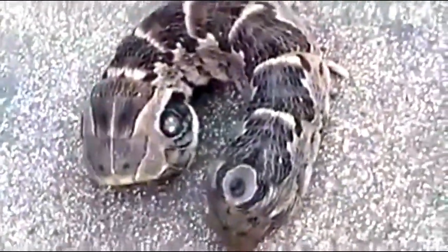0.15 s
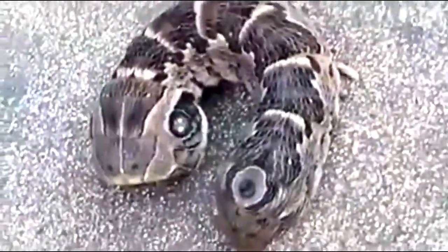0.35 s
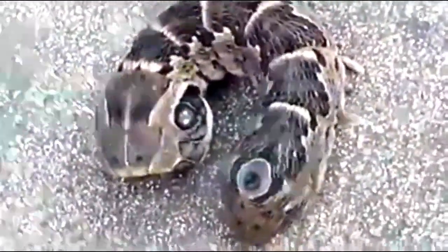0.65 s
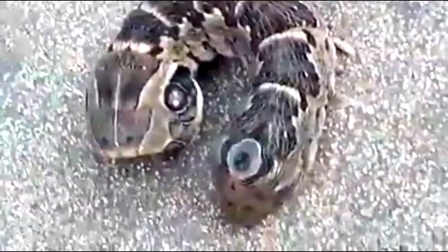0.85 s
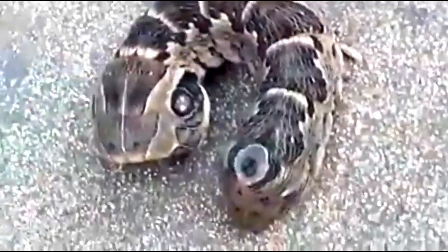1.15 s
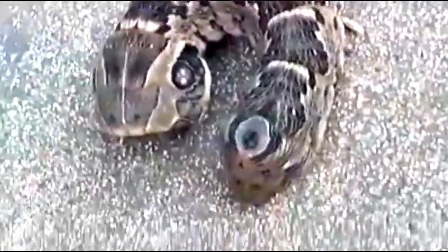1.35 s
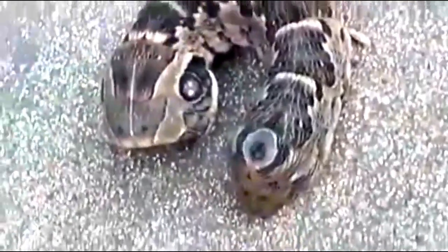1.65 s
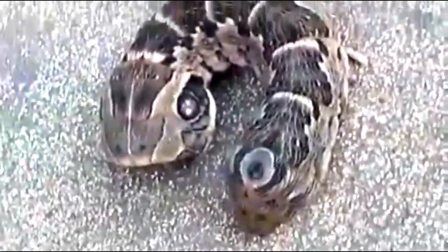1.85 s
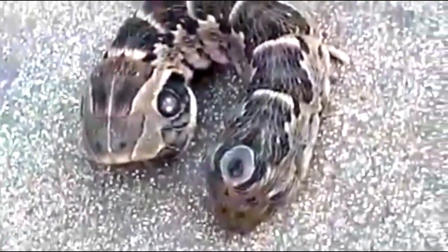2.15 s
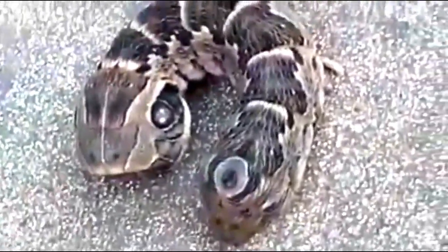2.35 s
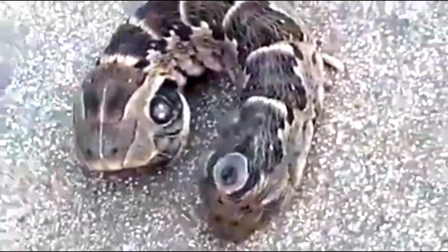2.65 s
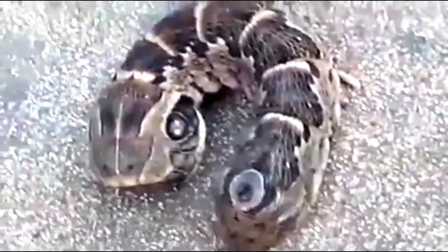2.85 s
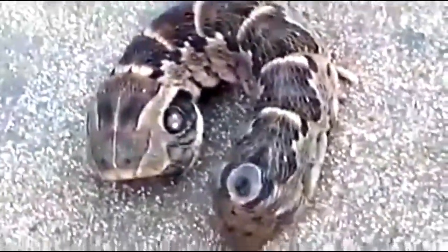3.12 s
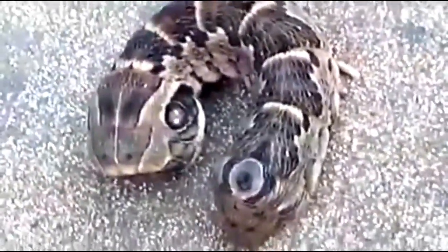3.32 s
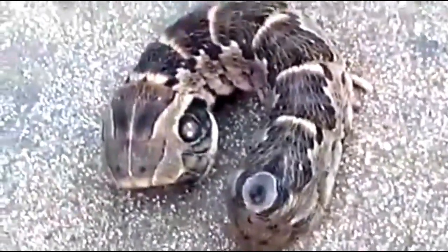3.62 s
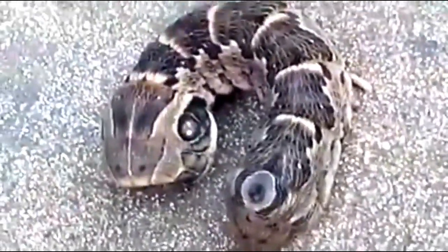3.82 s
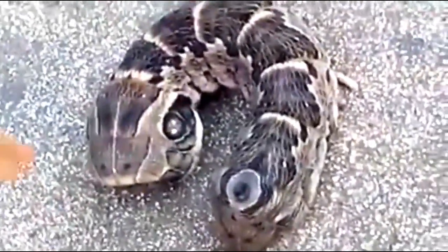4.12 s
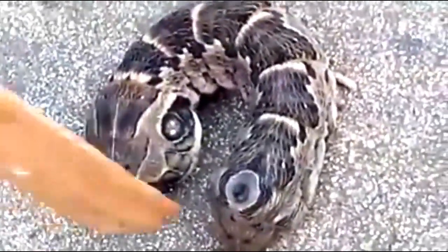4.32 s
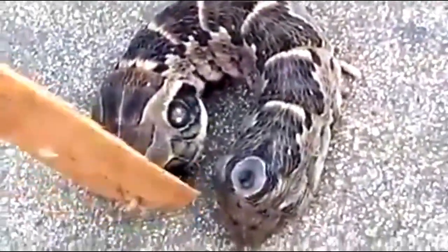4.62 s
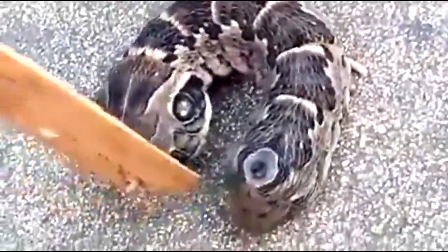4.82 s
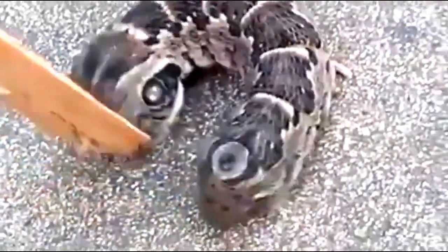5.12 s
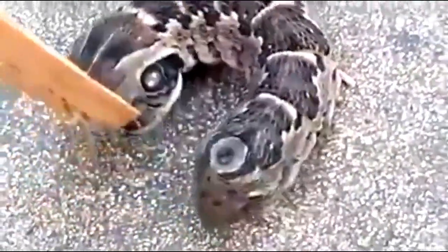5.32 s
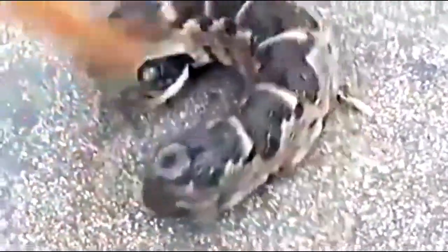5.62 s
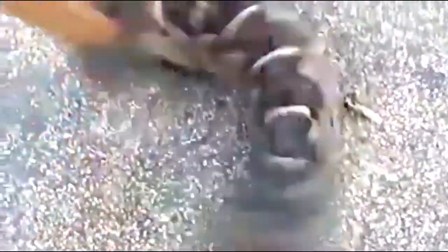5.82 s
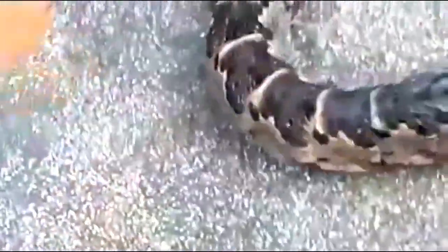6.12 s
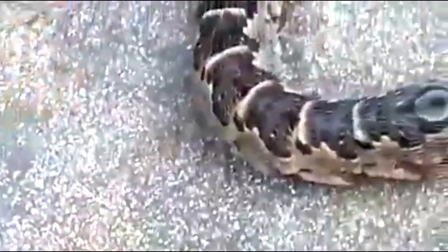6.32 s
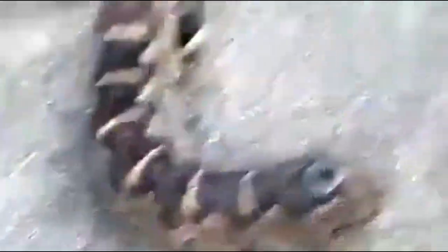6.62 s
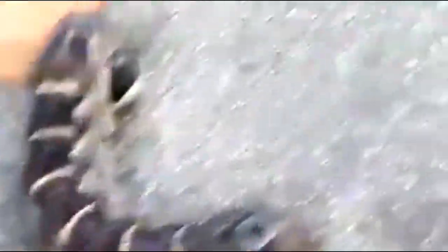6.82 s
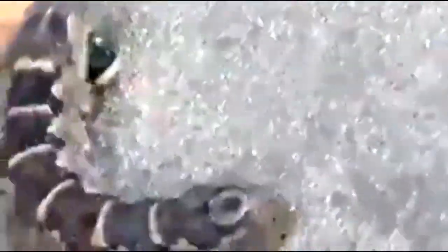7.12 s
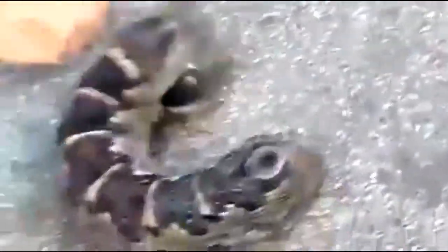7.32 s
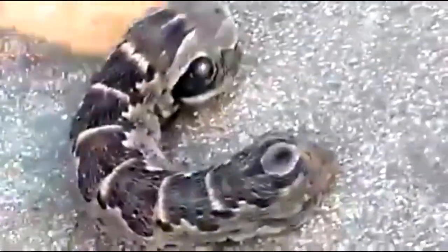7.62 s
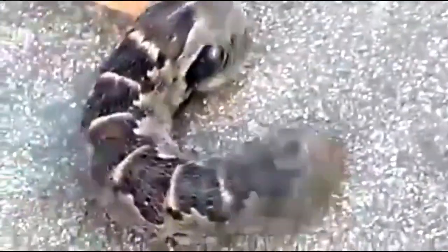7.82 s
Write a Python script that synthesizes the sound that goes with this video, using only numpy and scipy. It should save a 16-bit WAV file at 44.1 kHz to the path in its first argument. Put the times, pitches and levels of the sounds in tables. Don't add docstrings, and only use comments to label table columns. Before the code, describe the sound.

Outdoors on a hard, gritty slab, over a faint unsteady low hum and thin air hiss. At 0 s a hard knock clatters into quick slaps and bright grit skids until about 0.15 s. Quiet taps and a soft scuff lead to a sharp cracking knock at 1.2 s, with a lesser one at 1.5. A duller knock at 2.0 is followed by a crackly twist of grit from 2.2 to 2.5. Near quiet, then the loudest, cleanest knock at 3.4 with a deep boom and short wall echo. A dull double knock comes at 4.2, with a few grains after. A short knock lands at 5.4, trailing ticks, then a thin, cracking one at 6.2 with a small tap after. Tiny taps and a barely audible rub around 7.2 precede a soft knock at 7.4 with bright crunching grit, fading into hum.

```python
import sys
import numpy as np
from scipy import signal
from scipy.fft import rfft, irfft, next_fast_len
from scipy.io import wavfile
from scipy.ndimage import uniform_filter1d, map_coordinates

SR = 44100
rng = np.random.default_rng(int(sys.argv[2]) if len(sys.argv) > 2 else 0)


def wav_out(sig):
    wavfile.write(sys.argv[1], SR, np.round(np.clip(np.atleast_2d(sig).T, -1, 1) * 32767).astype(np.int16))


def field_ratio(decibels):
    return 10 ** (np.asarray(decibels, dtype=float) / 20)


N = 351029

# start in seconds, level in dB.
LANDINGS = [
    (-.04, -43.5),
    (1.249, -43.5),
    (1.991, -49),
    (3.403, -40.5),
    (4.19, -59),
    (5.425, -44),
    (5.871, -64.5),
    (6.929, -64.5),
    (7.428, -50.5),
]


def unit(x):
    return x / np.sqrt(np.mean(x ** 2) + 1e-20)


def peak(x):
    return x / np.max(np.abs(x))


def along(points, hz):
    f, v = np.transpose(points)
    return np.interp(np.log(hz + 1), np.log(f + 1), v)


def curve(rows, axis=1):
    rows = np.array(rows)
    return np.interp(np.arange(N) / SR, rows[:, 0], rows[:, axis], left=-130, right=-130)


def filtered(x, response):
    m = next_fast_len(len(x) + 2048)
    spectrum = rfft(x, m) * response(np.fft.rfftfreq(m, 1 / SR))
    return irfft(spectrum, m)[:len(x)]


def mode(f, hz, width):
    return 1j * f * width / (hz * hz - f * f + 1j * f * width)


def soft(f, hz):
    return hz * hz / (hz * hz - f * f + 1.4j * f * hz)


def add(track, s, x):
    i = round(s * SR)
    x = x[..., max(-i, 0):][..., :N - max(i, 0)]
    track[..., max(i, 0):max(i, 0) + x.shape[-1]] += x


def burst(length_s, spike, hold):
    t = np.arange(2048) / SR
    noise = rng.standard_normal(len(t))
    rise = 1 - np.exp(-t / (0.039 * hold * length_s))
    return noise * np.abs(noise) ** spike * rise * np.exp(-(t / length_s) ** hold)


def contact(force, db, response, axis):
    out = np.zeros((3, len(force)))
    out[0] = field_ratio(db) * peak(filtered(force, response))
    samples = np.arange(len(force))
    even = filtered(samples == 0, response) * np.exp(-samples / (.003 * SR))
    out[axis] = even * np.linalg.norm(out[0]) / np.linalg.norm(even)
    return out


def slab():
    # pitch in Hz, level in dB, time to die 60 dB in seconds.
    slab_modes = [(32.1, 2, 0.78), (42.7, -2.5, 1)]
    out, t = np.zeros(N), np.arange(SR) / SR
    for s, db in LANDINGS:
        start = rng.random()
        ring = sum(field_ratio(level_db - 60 * t / t60) * np.sin(2 * np.pi * (hz * (t - .085) + start))
                   for hz, level_db, t60 in slab_modes)
        add(out, s, field_ratio(db + 6.5) * ring * (1 - np.exp(-t / 0.014)))
    return out


def hum():
    # frequency in Hz, density in dB per Hz.
    air_colour = [(35, -24), (60, -1), (177, -9.5), (263, -10.5), (349, -13), (401, -18.5), (705, -25),
                  (1360, -30), (2560, -35.5), (14900, -37), (16400, -49)]
    # time in seconds, level in dB.
    rumble_levels = [(0.0, -60.5), (0.33, -64), (1.13, -69), (1.42, -77.5), (1.77, -64.5), (2.22, -67.5),
                     (2.68, -70.5), (3.3, -72.5), (3.55, -56.5), (3.77, -64), (4.17, -58.5), (4.5, -68),
                     (5.23, -73), (5.61, -58), (6.78, -68.5), (7.42, -74.5), (7.58, -61), (7.96, -60)]
    hum_db, stirred_db, settles_db_per_s = -74.5, -9.5, 64.5

    def sway(rate_hz):
        drift = rng.standard_normal(int(N * rate_hz / SR) + 4)
        return map_coordinates(drift, [np.arange(N) * rate_hz / SR])

    rumble = unit(filtered(rng.standard_normal(N), lambda f: mode(f, 38, 22) ** 2))
    air = filtered(rng.standard_normal(N), lambda f: field_ratio(along(air_colour, f)) * (f > 55))
    far = unit(filtered(air, lambda f: 1 / (1 + (f / 700) ** 2)))
    hiss = filtered(unit(air), lambda f: 1 / (1 + (700 / (f + 1)) ** 2))
    t = np.arange(N) / SR
    stirred = sum(field_ratio(db + stirred_db - settles_db_per_s * np.abs(t - s)) * (t > s) for s, db in LANDINGS)
    low = field_ratio(curve(rumble_levels) + 1.1 * sway(18)) * rumble
    return low + (field_ratio(hum_db) + stirred) * field_ratio(0.4 * sway(3.5)) * far + field_ratio(-71.5) * hiss


def blows():
    # start in seconds, knock in dB, crack in dB, chatter in seconds, main mode in Hz.
    heel_rows = [
        (0.0, -17.5, -18, 0.0082, 297.7),
        (1.232, -14.5, -6.5, 0.0079, 510),
        (1.509, -19, -53, 0.0071, 555.3),
        (2.009, -17, -22.5, 0.0076, 490.8),
        (3.381, -8, -16.5, 0.0049, 639),
        (4.186, -16, -27, 0.0059, 445),
        (5.405, -16, -15.5, 0.004, 540),
        (6.166, -33, -5.5, 0.0035, 1213),
        (7.409, -25, -5, 0.0063, 382.5),
    ]
    # start in seconds, knock in dB, weight in dB, crack in dB, main mode in Hz.
    slap_rows = [(0.012, -19, -14, -12, 327.7), (0.044, -26.5, -2.5, -15, 421),
                 (0.077, -25.5, -36, -13.5, 608), (1.243, -25.5, -3.5, -17.5, 329),
                 (1.991, -21.5, -8.5, -10, 499), (1.997, -25.5, -4.5, -13, 404.5),
                 (2.039, -35.5, 4, -7, 524), (3.393, -21, -3, -15.5, 322), (4.193, -22, -3.5, -12, 366),
                 (4.202, -17, -52, -28, 496), (5.417, -37.5, -9.5, 1, 444), (6.173, -31, -3.5, -46.5, 301),
                 (6.178, -28, -7.5, -5.5, 306), (6.328, -37, -4.5, -12.5, 460),
                 (7.407, -21.5, -1, -14.5, 330)]
    # centre in Hz, width in Hz, level in dB.
    sole_modes = [(100, 12, -7), (137, 41, 1), (327, 100, 2), (512, 25, -3), (743, 200, -3),
                  (1114, 240, -1), (1504, 320, -6), (1970, 350, -6), (2470, 280, -8.5), (3300, 1100, -14)]
    heel_weight_db, slap_chatter_s = -14.5, .0036
    heels = [(s, db, heel_weight_db, crack_db, chatter, hz) for s, db, crack_db, chatter, hz in heel_rows]
    slaps = [(s, db, weight_db, crack_db, slap_chatter_s, hz) for s, db, weight_db, crack_db, hz in slap_rows]
    out = np.zeros((3, N))
    for s, db, weight_db, crack_db, chatter, hz in heels + slaps:
        force = burst(chatter, spike=.8, hold=1.5)
        scatter = rng.normal(0, 2, len(sole_modes))
        force[20] = 0.49 * np.linalg.norm(force)
        hard_hz = 2600 * field_ratio(0.28 * (crack_db + 21.5))

        def ring(f, modes):
            return sum((-1) ** k * field_ratio(level_db + scatter[k]) * mode(f, centre, width)
                       for k, (centre, width, level_db) in enumerate(modes))

        def knock_colour(f):
            main = field_ratio(9.0) * mode(f, hz, 0.13 * hz) * hz / (1j * f + 1)
            return (ring(f, sole_modes[3:]) + main) * soft(f, hard_hz)

        knock = contact(force, db - 0.5, knock_colour, axis=1)
        thud = contact(force, db + weight_db + 3.5, lambda f: ring(f, sole_modes[:3]) * soft(f, 500), axis=1)
        edge = burst(chatter, spike=0.54, hold=0.75)
        crack = contact(edge, db + crack_db + 6.5, lambda f: mode(f, 1.5 * hard_hz, 3.2 * hard_hz) ** 2, axis=2)
        add(out, s - .0008, knock + thud + crack)
    return out


def grit(rows, hold, wet_db, lead):
    def sole_colour(f):
        return (mode(f, 900, 400) - .8 * mode(f, 1600, 820)) * mode(f, 1100, 4500)

    out = np.zeros((3, N))
    for s, db, dull_db, hz, length in rows:
        force = burst(length, spike=0.45, hold=hold)
        force[10] = lead * np.linalg.norm(force)
        snap = contact(force, db + 2.0, lambda f: mode(f, hz, 1.5 * hz) ** 2, axis=2)
        tap = contact(force, db + dull_db, sole_colour, axis=1)
        add(out, s - .0005, snap + tap)
    return out * field_ratio([[0], [wet_db], [wet_db]])


def all_grit():
    # start in seconds, peak in dB, dull part in dB, centre in Hz, length in seconds.
    skids = [(.003, -27.5, -13.5, 8000, 0.013), (0.053, -30, -6, 5860, 0.0058),
             (.044, -35, 2.5, 3000, .005), (0.105, -40.5, -7, 6110, 0.019), (0.13, -31, -8, 5740, .026),
             (1.505, -57.5, 5.5, 2500, .005), (1.510, -42, -5, 3503, 0.0082),
             (1.534, -49, -6, 7900, 0.0018), (1.974, -43.5, 6, 4890, 0.023),
             (4.179, -30, -6.5, 6016, 0.0093), (4.204, -34, -3, 7236, 0.013),
             (5.399, -34.5, -1.5, 7447, 0.0064), (5.417, -34, 7.5, 6000, 0.011),
             (5.432, -47.5, -15.5, 7000, 0.0086), (5.496, -45.5, -13, 10000, .002),
             (5.516, -48, -17, 7450, .003), (6.161, -31.5, -9, 7050, .006), (6.166, -27, -5, 8860, 0.0077),
             (6.216, -32, -13, 9740, 0.016), (7.404, -48.5, 7.5, 3000, 0.0049),
             (7.413, -26, -2.5, 7681, 0.018), (7.431, -18, -11, 9180, 0.0076),
             (7.44, -18.5, -17, 8450, 0.014), (7.489, -25, -12, 10200, .003)]
    # start in seconds, peak in dB, dull part in dB, centre in Hz.
    grains = [(0.388, -55.5, -35, 6170), (1.264, -37.5, -11, 3700), (1.394, -45, -0.5, 7530),
              (1.7793, -55.5, 2.5, 3650), (2.578, -69, 10.5, 3500), (2.691, -68.5, 7, 3740),
              (2.849, -59, 1.5, 3500), (3.2088, -62.5, 7, 3940), (3.3967, -26.5, -7.5, 7210),
              (3.7287, -64.5, -3, 3752), (3.8168, -71, 4.5, 3650), (4.3107, -47, -3, 3670),
              (4.4333, -39.5, -9.5, 3503), (4.733, -72.5, 15, 12650), (5.4609, -33.5, 2, 5730),
              (5.6188, -39.5, -12, 3994), (5.681, -61.5, 9.5, 3492), (5.7867, -51.5, -5, 5500),
              (5.848, -43, -1, 5020), (6.2027, -36, -8, 8700), (7.1127, -56, 0.5, 6070),
              (7.5192, -24.5, -13, 4998)]
    # start in seconds, peak in dB, dull part in dB.
    graze_rows = [(.549, -68.5, -4.5), (1.148, -61.5, 6), (1.177, -63, -4), (1.186, -59, -16),
                  (1.203, -60, 8), (1.216, -49, -3.5), (3.317, -61.5, 1), (3.356, -55.5, -9.5),
                  (5.308, -65.5, -5), (5.327, -59, -2), (5.348, -66, 8.5), (5.369, -48.5, 0.5),
                  (5.379, -59, -5.5), (5.393, -56.5, -1)]
    # start in seconds, peak in dB.
    twist_rows = [(2.1914, -47.5), (2.1996, -53), (2.2194, -62), (2.233, -47), (2.244, -44), (2.2491, -45),
                  (2.2712, -39.5), (2.296, -41.5), (2.329, -54.5), (2.343, -54), (2.3526, -50.5),
                  (2.375, -43), (2.3938, -49), (2.431, -70), (2.4462, -51.5), (2.4808, -66)]
    grain_s, graze_s, graze_hz = .002, .004, 5500
    twist_hz, twist_dull_db, dulls_db_per_s = 4340, -14, 62
    lone = [(*row, grain_s) for row in grains]
    twist_start = twist_rows[0][0]
    twist = [(s, db, twist_dull_db + dulls_db_per_s * (s - twist_start), twist_hz, grain_s)
             for s, db in twist_rows]
    grazes = [(*row, graze_hz, graze_s) for row in graze_rows]
    crushed = grit(lone + twist, hold=1.5, wet_db=-3, lead=.6)
    return crushed + grit(grazes + skids, hold=2.4, wet_db=-2.5, lead=0.18)


def walls(x):
    # frequency in Hz, time to die 60 dB in seconds.
    decay_times = [(100, 0.21), (500, 0.7), (1500, 0.62), (4000, 0.58), (8000, 0.55), (14000, 0.15)]
    # frequency in Hz, level in dB.
    sent_back = [(100, -6), (500, -7), (2000, -4.5), (8000, -3.5), (15000, -4)]
    out, size = np.zeros(N), SR // 2
    for i in range(0, N, size):
        hz, t, z = signal.stft(rng.standard_normal(SR * 3 // 4), SR, nperseg=256)
        fade = field_ratio(-60 * t / along(decay_times, hz)[:, None]) + 3.3 * field_ratio(-60 * t / 0.21)
        tail = signal.istft(z * fade, SR, nperseg=256)[1]
        add(out, i / SR + .004, signal.fftconvolve(x[i:i + size], tail / np.linalg.norm(tail)))
    return filtered(out, lambda f: field_ratio(along(sent_back, f)))


def corner(x):
    # pitch in Hz, width in Hz, level in dB.
    standing_waves = [(330, 5.6, -3), (510, 6, 1), (1990, 14, -6)]
    return field_ratio(-3) * filtered(x, lambda f: sum(field_ratio(db) * mode(f, hz, width) for hz, width, db in standing_waves))


def drag():
    # moment of most pressure in seconds, level in dB, seconds to build up 20 dB,
    # seconds to die 20 dB (the sign of both is ignored), sole resonance in Hz.
    drag_rows = [(.53, -79, -0.4, 0.6, 1137), (1.14, -73, 0.04, -1.5, 1700), (1.18, -63, -0.23, 0.3, 1850),
                 (1.218, -58.5, -0.04, 0.3, 1200), (1.62, -71, -1.5, .5, 786.6),
                 (2.25, -54, 0.11, 0.15, 1332), (2.29, -54, 0.1, 0.14, 450),
                 (3.322, -59, .008, -0.48, 1506), (3.372, -56, -0.03, 0.1439, 1440),
                 (5.393, -60, 0.1086, 0.26, 1090), (5.87, -70.5, 0.4, 0.4, 2833),
                 (7.25, -78, -0.4, -0.5, 1237), (7.38, -79, -0.2, 2.8, 870)]
    # time in seconds, level in dB.
    rub_levels = [
        (7.13, -97.5),
        (7.2, -85),
        (7.31, -85.5),
        (7.37, -95),
    ]
    bright_db = -14.5
    clumps = field_ratio(5 * unit(uniform_filter1d(rng.standard_normal(N), size=90)))
    rough = clumps * rng.standard_normal(N)
    bright = unit(filtered(rough, lambda f: mode(f, 7100, 6700) ** 2))
    rub = unit(filtered(rng.standard_normal(N), lambda f: mode(f, 1360, 90) ** 2))
    out = field_ratio(curve(rub_levels)) * rub
    around = np.arange(-SR // 2, SR // 2)
    t = around / SR
    for s, db, build, die, hz in drag_rows:
        i = np.clip(round(s * SR) + around, 0, N - 1)
        dull = unit(filtered(rough[i], lambda f: mode(f, 710, 1500) ** 2 + 1.4 * mode(f, hz, .2 * hz)))
        pressure_db = db - 20 * np.where(t < 0, -t / abs(build), t / abs(die))
        add(out, s - .5, field_ratio(pressure_db - 2.5) * (dull + field_ratio(bright_db) * bright[i]))
    return out


def taps():
    # start in seconds, peak in dB, pitch in Hz.
    tap_rows = [(.535, -60.5, 1000), (.549, -64, 2020), (.637, -70, 1800), (.92, -69, 1891),
                (.938, -62.5, 1688), (1.02, -68, 909.7), (1.048, -59, 800), (1.049, -60, 1700),
                (1.177, -52.5, 1850), (3.208, -57.5, 850), (3.209, -58, 2000), (3.273, -60, 916.5),
                (3.316, -57.5, 1500), (3.325, -50.5, 347.6), (3.352, -61, 2010), (2.849, -59, 1900),
                (4.733, -62.5, 650), (1.204, -56, 913), (1.778, -60, 600), (5.74, -62.5, 751.7),
                (5.955, -57.5, 1001), (6.329, -37.5, 424), (1.233, -20.5, 1797), (6.685, -67, 803),
                (6.977, -60.5, 797.4), (7.111, -60, 900), (7.36, -72, 897)]
    contact_s, width_over_pitch = 0.0028, .6
    out = np.zeros((3, N))
    for s, db, hz in tap_rows:
        force = burst(contact_s, spike=.35, hold=1.6)
        force[10] = 1.5 * np.linalg.norm(force)
        add(out, s - .001, contact(force, db + 1.0, lambda f: mode(f, hz, width_over_pitch * hz) ** 2, axis=1))
    return out * field_ratio([[0], [-4], [0]])


def scene():
    direct, dull, bright = blows() + all_grit() + taps()
    slide = drag()
    echoes = walls(dull + field_ratio(-4) * slide) + field_ratio(-2.5) * walls(bright)
    steps = direct + slide + echoes + corner(dull)
    return (filtered(steps, lambda f: soft(f, 9000)) + slab() + hum())[None]


def low_pass(x):
    return signal.sosfilt(signal.butter(12, 16500, fs=SR, output="sos"), x)


def record(dry):
    heard = filtered(dry[0], lambda f: f < 16080)
    return low_pass(heard[None])


dry = scene()
out = record(dry)
wav_out(out)
```